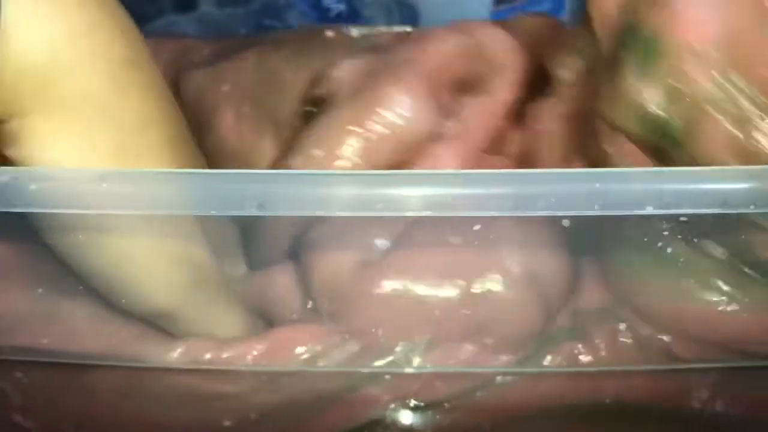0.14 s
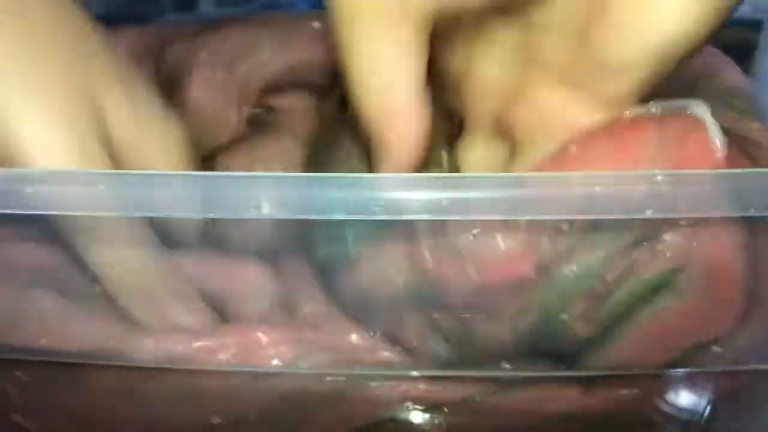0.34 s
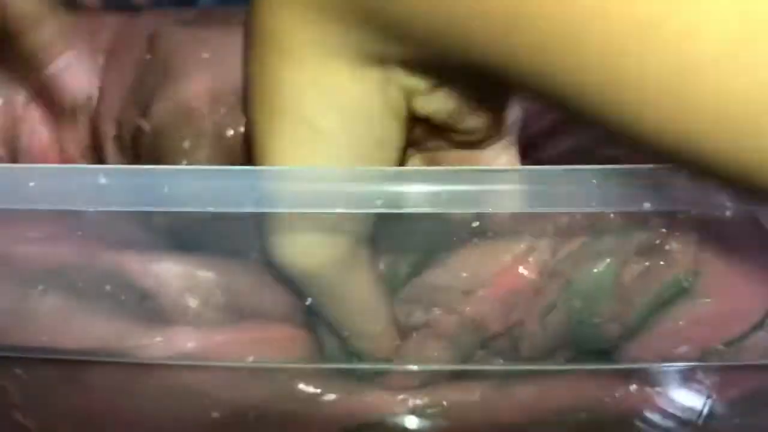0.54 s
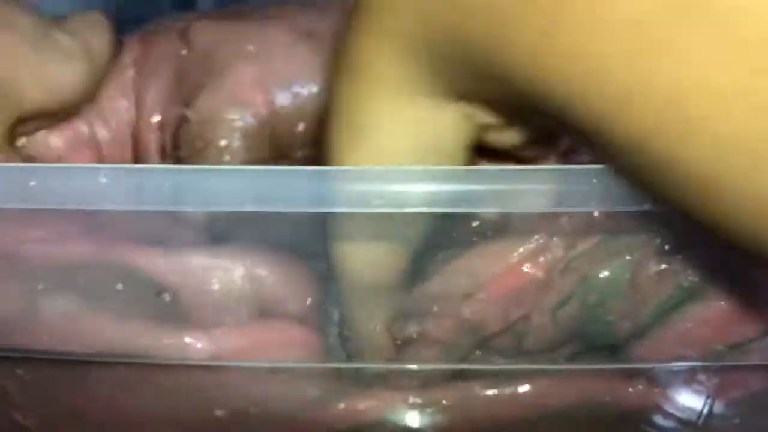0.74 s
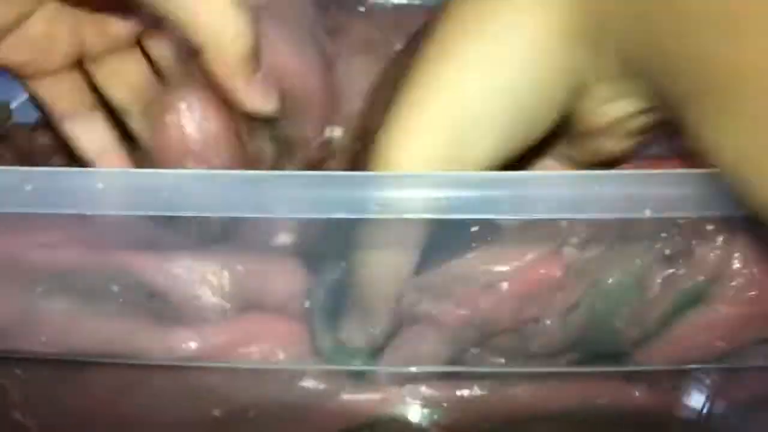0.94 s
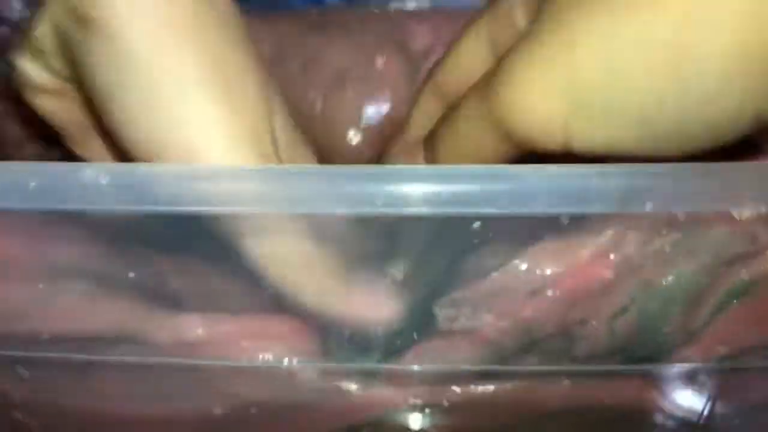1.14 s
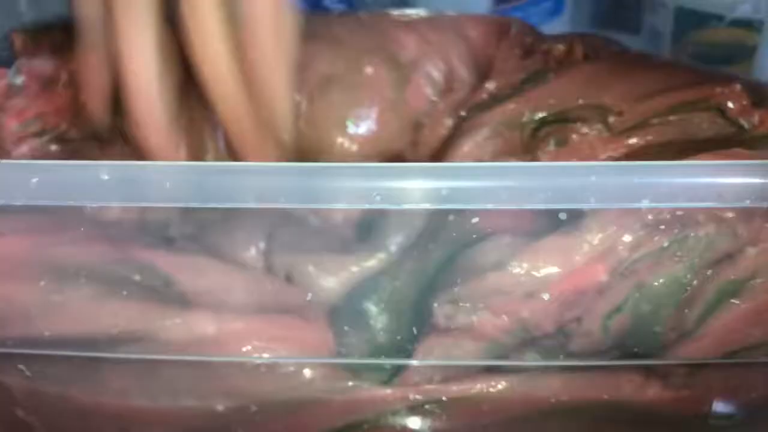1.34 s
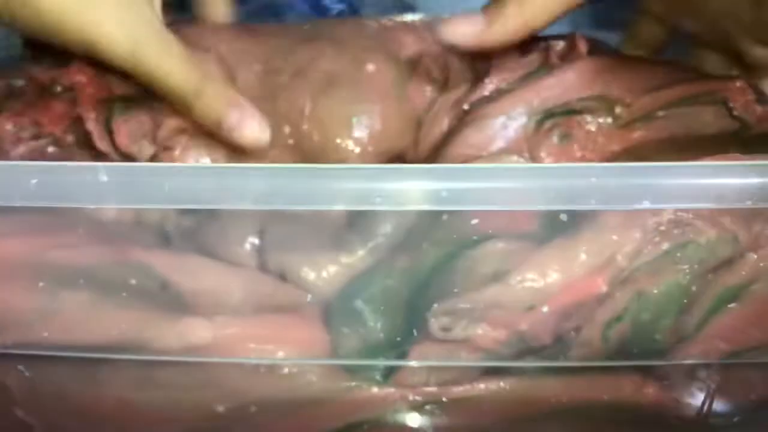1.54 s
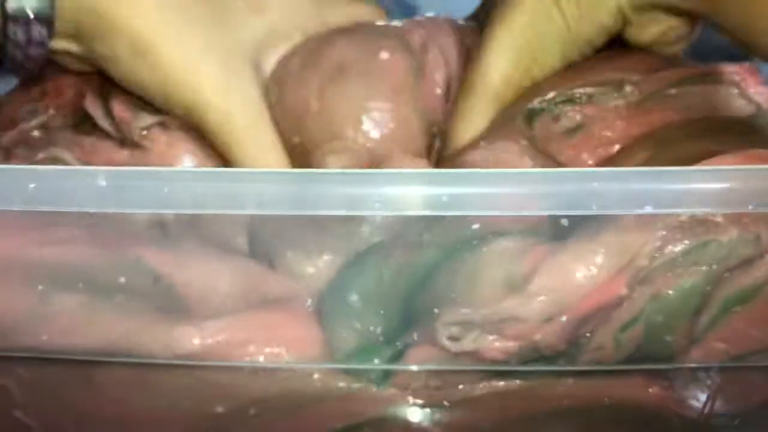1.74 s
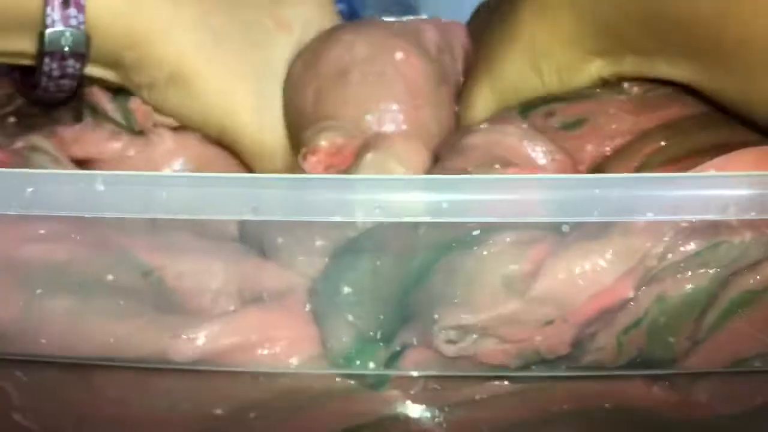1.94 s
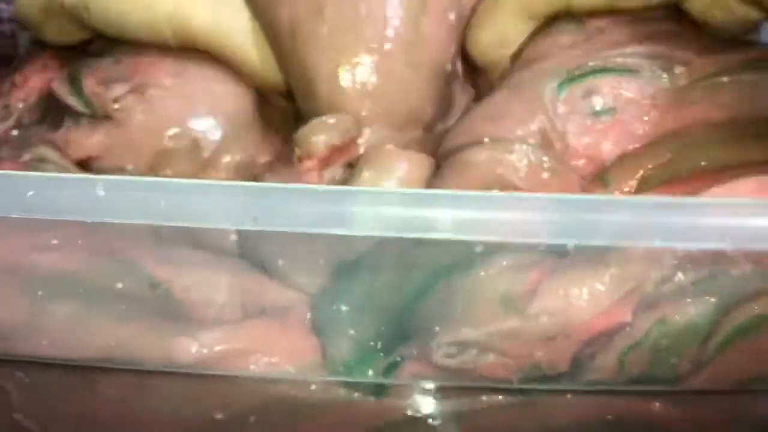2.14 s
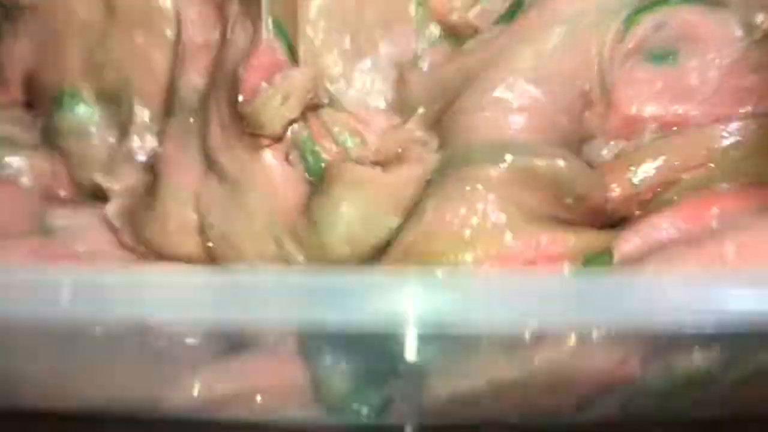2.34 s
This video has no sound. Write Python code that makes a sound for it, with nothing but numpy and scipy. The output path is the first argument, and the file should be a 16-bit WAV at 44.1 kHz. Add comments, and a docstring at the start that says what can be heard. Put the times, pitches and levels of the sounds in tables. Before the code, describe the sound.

Wet slime squelches, clicks and pops irregularly as hands squeeze it, close by.

```python
"""Two hands knead soft slime in a plastic tub, close to the microphone in a small room.
Over faint air and hum, the first squeeze tears tiny air cells in a wet crackle. Larger pockets burst
with a crack, a ring and a falling gulp, and deep folds close with a dull gloop. The bursts crowd
together near 0.45 s, return in clusters, then thin out after 1.9 s as the squeezes weaken.
After each burst the tub resonates and the room reverberates briefly."""
import sys
import numpy as np
from scipy import signal
from scipy.fft import rfft, irfft
from scipy.io import wavfile
from scipy.ndimage import uniform_filter1d

SR = 44100
rng = np.random.default_rng(int(sys.argv[2]) if len(sys.argv) > 2 else 0)


def transcribe(signal):
    """Save signal, clipped to [-1, 1], as a 16-bit WAV file at the path in sys.argv[1]."""
    frames = np.atleast_2d(signal).T
    limited = np.clip(frames, -1, 1)
    pcm = np.round(limited * 32767).astype(np.int16)
    wavfile.write(sys.argv[1], SR, pcm)


N = 105840  # 2.4 s


def undb(db):
    """Amplitude ratio of a level in decibels."""
    return 10 ** (np.asarray(db) / 20)


def unit(x):
    """Normalisation to rms 1."""
    return x / np.sqrt(np.mean(x ** 2) + 1e-18)


def burst(x, db):
    """Energy normalisation: a transient gets the energy of one millisecond at this level."""
    return x * undb(db) * np.sqrt(SR / 1000 / (np.sum(x ** 2) + 1e-18))


def add(out, start_s, x):
    """Superposition of x on out, from a given time."""
    i = int(np.clip(start_s * SR, 0, N - 1))
    out[i:i + len(x)] += x[:N - i]


def colour(x, points):
    """Minimum-phase filtering through points of (frequency [Hz], gain [dB])."""
    hz, db = np.array(points).T
    size = 4096
    bin_hz = np.arange(size // 2 + 1) * SR / size
    gain = undb(np.interp(np.log(bin_hz + 1), np.log(hz), db))
    cepstrum = irfft(np.log(gain))
    cepstrum[1:size // 2] *= 2  # folding the cepstrum makes the filter causal
    cepstrum[size // 2 + 1:] = 0
    response = irfft(np.exp(rfft(cepstrum)))
    return signal.fftconvolve(x, response)[:len(x)]


def cavity(hz, swell_s, half_fall_oct):
    """Damped resonance of an air pocket: its pitch falls, passing hz as it peaks at swell_s."""
    age = np.arange(int(6 * swell_s * SR) + 4) / (swell_s * SR)
    octaves = 2 * half_fall_oct * (np.exp(-age) - np.exp(-1))
    pitch = np.minimum(hz * 2 ** octaves, SR / 2)
    envelope = age ** 2 * np.exp(-2 * age)
    return envelope * np.sin(2 * np.pi * np.cumsum(pitch) / SR)


# Spectrum of the room air (frequency [Hz], relative level [dB])
AIR_SPECTRUM = [(20, -31), (40, -33), (75, -15.5), (120, -3), (170, -6), (260, -7), (450, -10),
                (700, -11.5), (1200, -23.5), (3500, -28.5), (6000, -27), (16000, -34)]
def background(air_db=-61, hum_hz=116, hum_db=-73):
    """Stationary noise floor: broadband room air plus a low pure-tone hum."""
    air = unit(colour(rng.standard_normal(N), AIR_SPECTRUM))
    hum = unit(np.sin(2 * np.pi * hum_hz * np.arange(N) / SR))
    return undb(air_db) * air + undb(hum_db) * hum


def cells(low_hz, high_hz, rate, cycles, spread_db):
    """Shot noise: tiny air cells burst at random times, pitches and sizes, in a stream of even level."""
    out = np.zeros(N)
    draws = rng.random((14000, 3))
    for when, pitch, chance in draws[:int(rate * N / SR)]:
        hz = low_hz * (high_hz / low_hz) ** pitch
        size_db = -spread_db * np.log(max(chance, .02))
        add(out, when * N / SR, burst(cavity(hz, cycles / hz, half_fall_oct=0.21), size_db))
    running_power = uniform_filter1d(out ** 2, size=1300)
    return out / np.sqrt(running_power + 1e-9)


# Squeezes, with the relative levels of large, middling and tiny cells
# (peak time [s], rise [s], fall [s], squelch [dB], crackle [dB], fizz [dB])
SQUEEZES = [(.043, 0.043, 0.028, -42.5, -52.5, -55), (.108, 0.0072, 0.011, -55, -49.5, -53.5),
            (0.158, 0.02, 0.014, -53, -49.5, -49.5), (.226, 0.053, 0.058, -49, -47, -48),
            (0.293, 0.008, 0.026, -53, -48.5, -49.5), (.402, 0.017, .05, -44.5, -47.5, -45),
            (.436, 0.016, 0.032, -41.5, -37, -40), (0.46, 0.0041, 0.0061, -58, -32, -40),
            (0.473, .007, 0.011, -29.5, -34, -39), (.602, 0.01, 0.011, -53, -54.5, -56),
            (0.753, 0.01, 0.066, -50.5, -46.5, -46.5), (0.814, 0.0054, 0.045, -51, -50, -56),
            (0.887, 0.026, 0.036, -41, -43, -41.5), (1.009, 0.013, 0.011, -45.5, -45.5, -49.5),
            (1.05, 0.018, 0.023, -37.5, -41, -39.5), (1.096, 0.017, 0.071, -43.5, -47, -50.5),
            (1.255, .03, 0.01, -44.5, -49, -52), (1.283, 0.0099, 0.024, -42, -51, -43),
            (1.304, 0.0098, 0.016, -37, -44.5, -59), (1.39, 0.015, 0.013, -31.5, -36.5, -37),
            (1.558, 0.012, 0.047, -69, -54.5, -56), (1.646, 0.036, 0.018, -46, -52.5, -50),
            (1.686, 0.017, 0.067, -57, -57.5, -56.5), (1.808, 0.025, 0.068, -50, -54, -48.5),
            (1.878, 0.014, .031, -53.5, -48.5, -49), (2.126, 0.03, 0.097, -49.5, -52.5, -53),
            (2.241, .015, 0.052, -48, -55.5, -58.5), (2.31, .025, 0.028, -48, -57, -56.5),
            (2.359, 0.0071, 0.041, -58, -49.5, -51)]
# Large, middling and tiny cells
# (lowest pitch [Hz], highest pitch [Hz], rate [1/s], swell [cycles], size spread [dB], trim [dB])
CELL_KINDS = [(598, 1134, 600, 1.42, 1.5, -4.5), (1056, 5070, 3000, 0.99, 4, 1),
              (4900, 17900, 4600, 1.12, 4, 0)]
# Spectral weighting of the cell bursts (frequency [Hz], gain [dB])
CELL_COLOUR = [(40, -25), (200, -16.5), (450, 3.5), (720, 1.5), (1150, -2.5), (1800, -4.5), (2500, -1),
               (3700, 0), (7000, -1.5), (13000, -0.5), (16000, 6.5)]
# Spectrum of the smacking mass (frequency [Hz], relative level [dB])
SMACK_SPECTRUM = [(30, -32), (90, -14), (160, -4.5), (270, -2.5), (400, -2), (600, 4), (1200, -26),
                  (5000, -79)]
def kneading(shape=1.53, cling_db=-75.5, smack_db=-11):
    """Amplitude modulation: each squeeze swells and fades the tearing cells and a low, soft smacking."""
    t, tearing = np.arange(N) / SR, np.zeros(N)
    rows = np.array(SQUEEZES)
    efforts = []
    for peak, rise, fall in rows[:, :3]:
        from_peak = np.maximum((peak - t) / rise, (t - peak) / fall)
        efforts.append(np.exp(-2 * from_peak ** shape))
    peak_powers = undb(rows.T[3:]) ** 2
    # powers add; the slime keeps clinging between squeezes
    strengths = np.sqrt(peak_powers @ np.array(efforts) + undb(cling_db) ** 2)
    for strength, (*kind, trim_db) in zip(strengths, CELL_KINDS):
        tearing += cells(*kind) * strength * undb(trim_db)
    smack = unit(colour(rng.standard_normal(N), SMACK_SPECTRUM)) * strengths[1]
    return colour(tearing, CELL_COLOUR) + undb(smack_db) * smack


# Bursting air pockets, levels before trim (time [s], crack level [dB], ring pitch [Hz],
# ring level [dB], ring swell [cycles], gulp pitch [Hz], gulp level [dB])
POCKETS = [(0.0211, -40, 2100, -30, 0.44, 685, -35.5), (0.0376, -39.5, 2800.0, -43, 1.0, 434, -33),
           (0.1268, -36.5, 4230, -40.5, 0.75, 593, -47), (0.1846, -39, 5450.0, -57, 1.3, 910.0, -56),
           (0.204, -30.5, 6440, -46, 0.49, 1030, -67), (0.2096, -31.0, 6350, -39, 0.59, 784, -45),
           (0.2231, -47.0, 2160, -31, 0.6, 510, -42), (0.2463, -40, 5600.0, -40.0, 1.1, 776, -38),
           (0.2615, -44, 3080, -33, 1.6, 1260, -42), (0.338, -51, 3080, -46, 1.5, 884, -58),
           (0.3958, -44, 3520.0, -37, 1.2, 740, -35.5), (0.4316, -31, 3470, -19, 1, 1130, -21.5),
           (0.4529, -28, 6500, -12, 0.62, 960, -41), (0.4554, -47, 3160, -18, 1.97, 1210.0, -35),
           (0.4571, -31, 4040, -14, 0.89, 1180, -29), (0.4615, -19, 4210.0, -36, 1.2, 950, -26.0),
           (0.4643, -26, 5250.0, -45, 0.62, 810.0, -45), (0.471, -24.5, 3120.0, -26, 0.92, 890, -27),
           (0.516, -50, 4020, -42, 0.5, 870, -40), (0.6673, -21.0, 4500, -17.5, 0.73, 690, -26),
           (0.745, -37, 7000, -33, 0.83, 1050, -57), (0.758, -37, 4430.0, -33, 0.65, 690, -42),
           (0.7748, -41, 4400, -26, 0.68, 970, -40.0), (0.7956, -58, 3970.0, -32, 0.83, 650.0, -66),
           (0.8102, -35.5, 2440, -29.5, 0.67, 670, -28), (0.8212, -56.0, 3900, -29.5, 0.8, 670, -37),
           (0.8829, -25.5, 3630, -21, 2, 620, -36), (0.893, -32.5, 6600, -25.5, 1.5, 1000, -53),
           (0.8957, -26, 3600, -22, 0.79, 575, -51), (0.9085, -39, 4020.0, -35, 1.0, 780.0, -55.0),
           (1.0055, -52, 2520, -30.5, 2.6, 715, -38), (1.039, -29, 3560, -32, 3, 980.0, -36),
           (1.051, -32, 7100, -23.5, 1.6, 755, -44), (1.0716, -40.5, 3330, -39, 1.3, 466, -29.0),
           (1.2569, -41.5, 7300, -31, 4, 676, -43), (1.2802, -36, 3500, -41, 1.7, 840, -31),
           (1.3066, -33.5, 3550, -31, 3.5, 920, -41), (1.3448, -41.5, 3950, -29, 0.49, 690, -26.5),
           (1.3938, -28.5, 3330, -14, 1.4, 724, -28), (1.504, -29, 3270, -22.5, 0.64, 1060, -24.5),
           (1.5464, -33, 2850, -24, 0.68, 920, -28.5), (1.5506, -39, 2850, -33.5, 0.9, 810, -34),
           (1.555, -42, 3300, -22, 0.55, 950, -30.5), (1.5819, -33.5, 6800, -41, 1.0, 855, -45),
           (1.6012, -57.0, 2650, -36, 0.67, 800.0, -48), (1.643, -41, 7410.0, -36.5, 0.54, 810, -42),
           (1.7796, -28.0, 5940, -37, 0.54, 880, -37), (1.7928, -35, 2400, -34, 2.8, 770, -27.0),
           (1.8096, -39, 4900, -29.5, 1.3, 600.0, -59), (1.833, -40.5, 5000, -31, 1.1, 644, -48),
           (1.8763, -40, 3470, -35, 0.77, 800, -37.5), (1.8894, -42, 5200, -36, 1.1, 726, -41.5),
           (1.9302, -68, 5900, -31, 0.7, 990, -50), (2.0602, -51, 6380, -44, 0.5, 1010, -73),
           (2.1226, -51, 2810.0, -38.5, 1.8, 630, -50), (2.1288, -39.5, 2740, -55, 3, 744, -33),
           (2.357, -46, 3700, -40.5, 1.7, 900, -62)]
def pops(crack_decay_s=0.00042, crack_hz=5570, gulp_cycles=0.89):
    """Impulse excitation: the skin cracks, the opening rings, and the pocket gulps as it widens."""
    out, t = np.zeros(N), np.arange(256) / SR
    crack_trim_db, ring_trim_db, gulp_trim_db = 4, -2.5, -0.5
    treble = signal.butter(2, crack_hz, "high", fs=SR, output="sos")
    for start, crack_db, ring_hz, ring_db, ring_cycles, gulp_hz, gulp_db in POCKETS:
        crack = signal.sosfilt(treble, rng.standard_normal(len(t)) * np.exp(-t / crack_decay_s))
        ring = cavity(ring_hz, ring_cycles / ring_hz, half_fall_oct=0.36)
        gulp = cavity(gulp_hz, gulp_cycles / gulp_hz, half_fall_oct=0.64)
        add(out, start, burst(crack, crack_db + crack_trim_db))
        add(out, start, burst(ring, ring_db + ring_trim_db))
        add(out, start, burst(gulp, gulp_db + gulp_trim_db))
    return out


# Closing folds (time [s], level [dB], pitch [Hz], swell [s], half of the pitch fall [octaves])
FOLDS = [(.022, -35.5, 330, 0.0028, 0.5), (0.038, -36, 366, 0.003, 0.66), (0.057, -37.5, 196, 0.0038, 1.2),
         (.1465, -31, 709, 0.0034, 0.19), (0.223, -33.5, 470, 0.0039, 0.9), (.467, -24, 856, 0.0061, 0.091),
         (0.67, -40.5, 326, 0.0033, 1.5), (1.071, -31, 330, 0.0028, 1.54),
         (1.2172, -22.5, 219, 0.0034, 1.4), (1.349, -38, 261, 0.0027, 0.91),
         (1.393, -19.5, 690, 0.0034, 0.13), (1.437, -32.5, 480, 0.0019, 2.03),
         (1.506, -40, 366, 0.0033, 1.07), (1.684, -38.5, 342, 0.0027, 1.2), (1.793, -33, 862, 0.0018, .5),
         (1.828, -34.5, 600, 0.0027, .1), (2.126, -35, 710, 0.0055, 0.14),
         (2.238, -34.5, 837, 0.0047, 0.097), (2.245, -39, 390, 0.0029, 0.92)]
def gloops():
    """Cavity resonance: deep folds close on trapped air with a soft, falling note."""
    out = np.zeros(N)
    for start, db, hz, swell_s, half_fall_oct in FOLDS:
        add(out, start, burst(cavity(hz, swell_s, half_fall_oct), db))
    return out


# Modes of the tub and the hollow in the slime (frequency [Hz], 60 dB decay time [s], gain [dB])
TUB_MODES = [(677, 0.023, -8.5), (846, 0.084, -8.5), (2790, 0.11, -4), (2940, 0.06, -18),
             (3644, 0.12, -10.5), (3980, 0.045, -9)]
def tub(x):
    """Modal resonance: every burst drives the damped modes of the tub and the hollow in the slime."""
    out = np.zeros(N)
    for hz, t60, db in TUB_MODES:
        pole = np.exp((2j * np.pi * hz - np.log(1000) / t60) / SR)
        ringing = signal.lfilter([1], [1, -pole], x).imag
        out += undb(db) * 2 * (1 - abs(pole)) * ringing
    return out


def early_reflections(x, t60_s=0.018, gain_db=-7.5):
    """Scattering between hands and tub walls smears each tick; the pattern changes as the hands move."""
    out, t = np.zeros(N), np.arange(SR // 40) / SR
    hop = 1024
    window = signal.windows.hann(2 * hop, sym=False)
    for i in range(0, N - 2 * hop, hop):
        scatter = rng.standard_normal(len(t)) * np.exp(-np.log(1000) * t / t60_s)
        scatter /= np.sqrt(np.sum(scatter ** 2))
        add(out, i / SR, signal.fftconvolve(x[i:i + 2 * hop] * window, scatter))
    return undb(gain_db) * out


# Spectral weighting of the reverberation (frequency [Hz], gain [dB])
ROOM_COLOUR = [(50, -27), (120, 0), (200, -1), (400, 7), (1000, -6.5), (4000, -8.5), (9000, -5.5),
               (16000, -8)]
def room(x, t60_s=0.19, gap_s=0.0025, trim_db=-11):
    """Reverberation: the diffuse field of a small room decays exponentially."""
    t = np.arange(SR // 2) / SR
    tail = rng.standard_normal(len(t)) * np.exp(-np.log(1000) * t / t60_s) * (t > gap_s)
    tail = colour(tail / np.sqrt(np.sum(tail ** 2)), ROOM_COLOUR)
    return undb(trim_db) * signal.fftconvolve(x, tail)[:N]


def scene():
    """Superposition of the slime's direct sound, the response of tub and room, and the noise floor."""
    slime = pops() + gloops() + kneading()
    near = slime + tub(slime) + early_reflections(slime)
    return (near + room(near) + background())[None]


# Response of the microphone and its housing (frequency [Hz], gain [dB])
MIC_RESPONSE = [(100, 2.5), (400, -2.5), (800, -2.5), (2000, 2), (2800, 0), (3400, -1), (4150, 2),
                (4600, -2.5), (5400, -4.5), (6300, 1.5), (7800, 0), (9000, -2.5), (10000, 0), (11600, 0.5),
                (12600, -1.5), (15000, -2), (16500, -24)]
def record(dry, low_cut_hz=67, top_hz=16200):
    """Band limiting: the microphone colours the sound and drops deep bass; the recorder cuts the top."""
    high_pass = signal.butter(2, low_cut_hz, "high", fs=SR, output="sos")
    low_pass = signal.ellip(8, .2, 70, top_hz, fs=SR, output="sos")
    heard = signal.sosfilt(high_pass, colour(dry[0], MIC_RESPONSE))
    return signal.sosfilt(low_pass, heard)[None]


dry = scene()
out = record(dry)
transcribe(out)
```